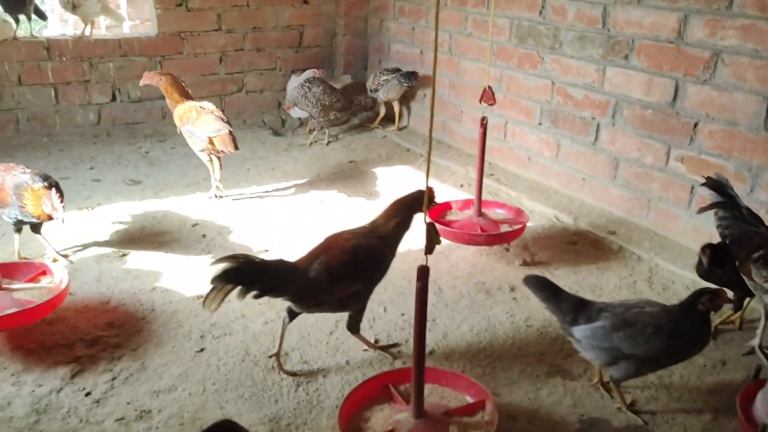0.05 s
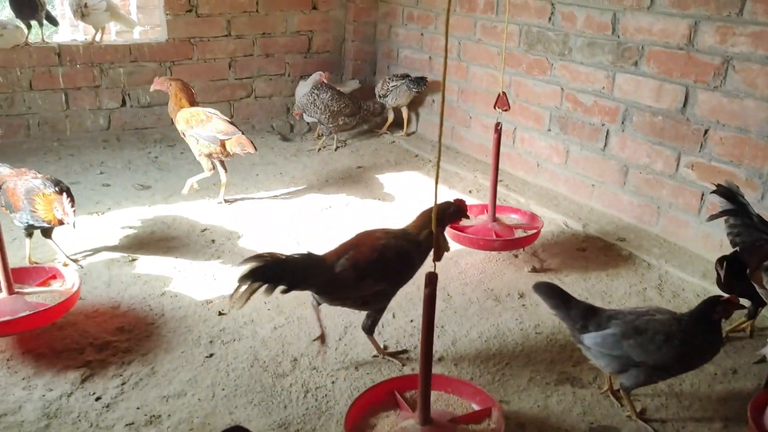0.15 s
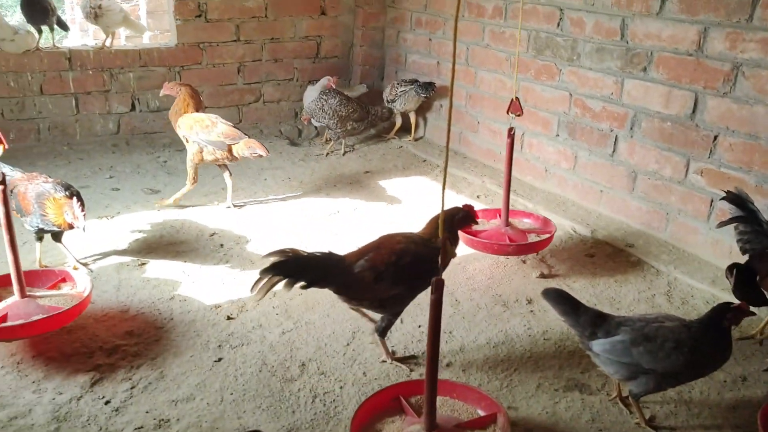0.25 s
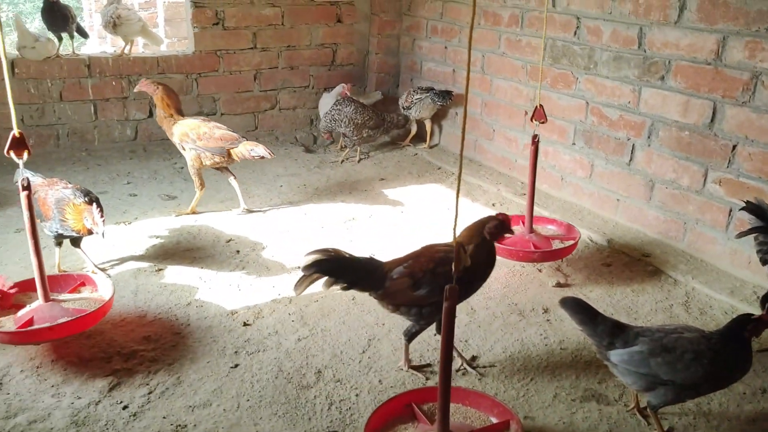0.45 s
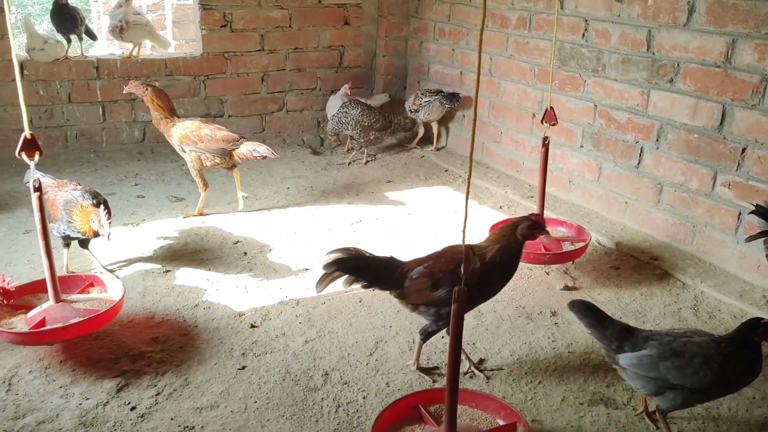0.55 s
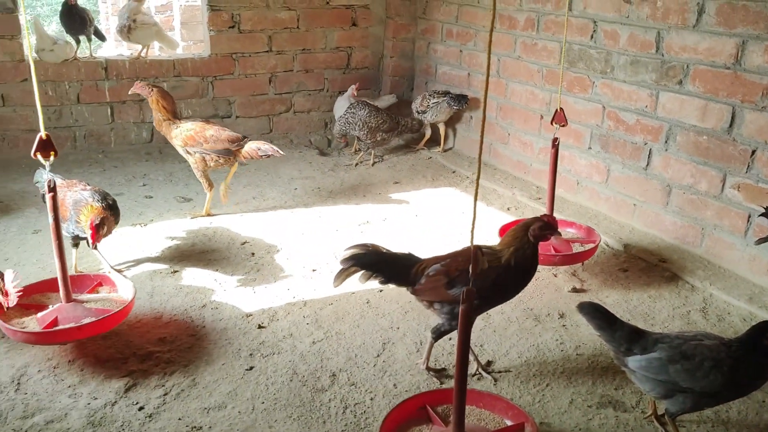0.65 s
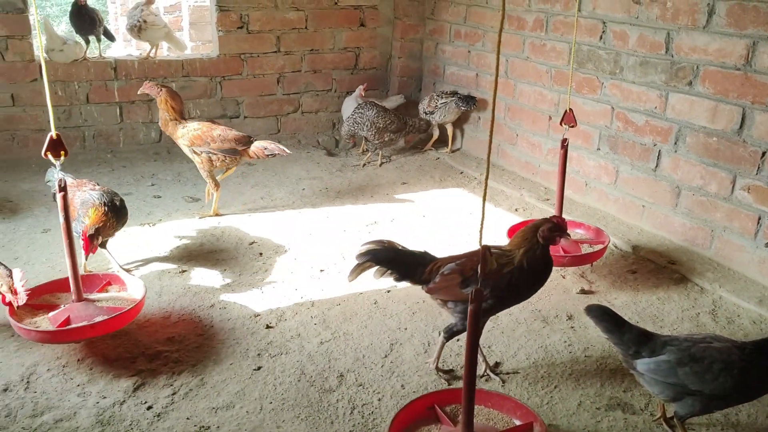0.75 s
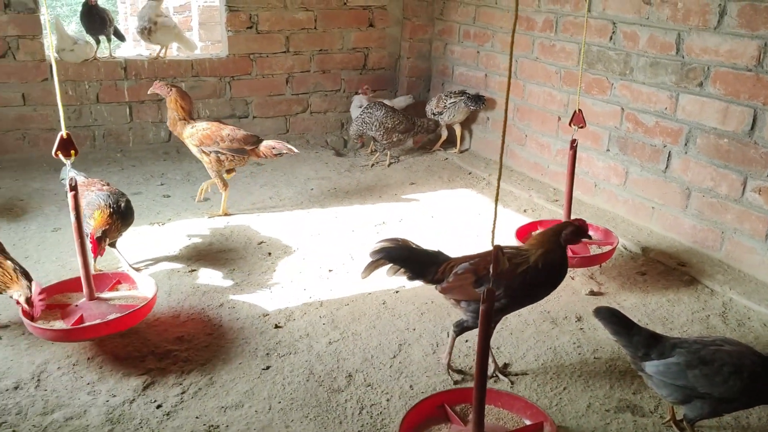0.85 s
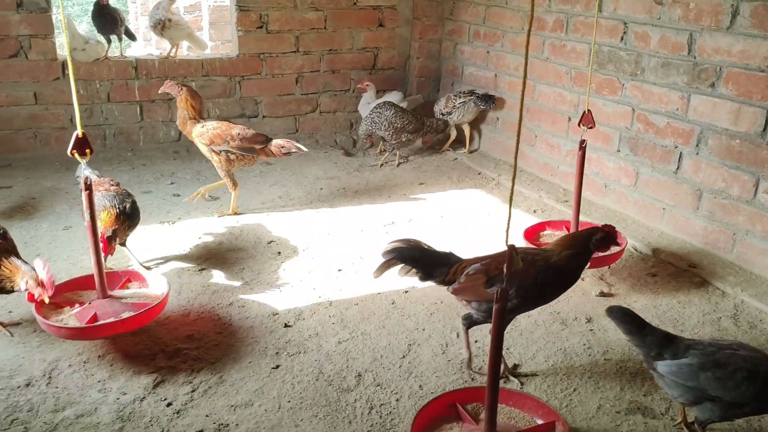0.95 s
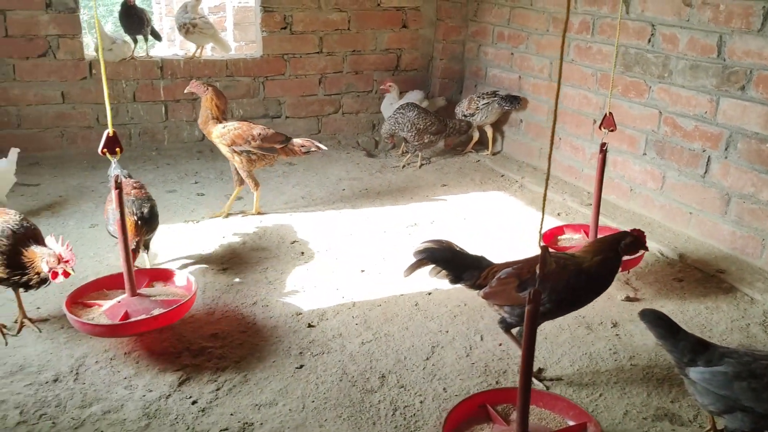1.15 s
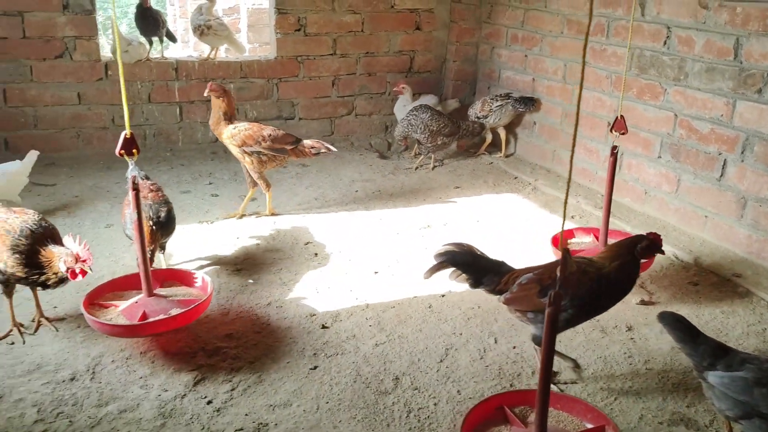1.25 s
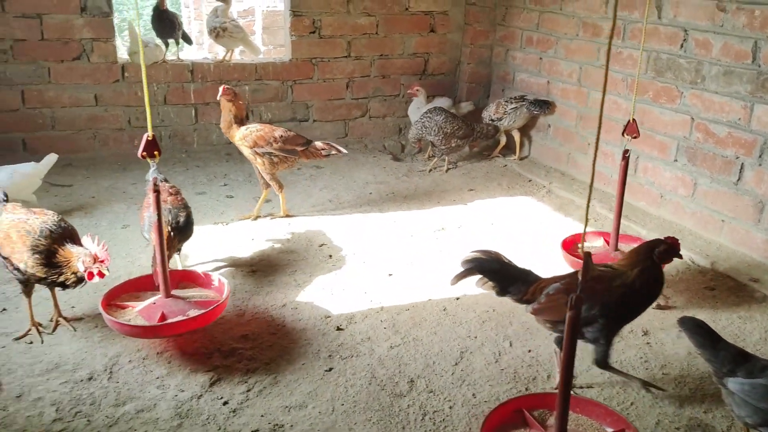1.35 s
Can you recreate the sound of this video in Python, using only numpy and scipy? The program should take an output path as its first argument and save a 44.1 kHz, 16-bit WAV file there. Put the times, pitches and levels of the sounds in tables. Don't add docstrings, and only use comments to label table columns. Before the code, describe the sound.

Single chicken squawk, raspy then droning, with distant thin peeps, soft coos and light feeder taps

```python
import sys
import numpy as np
from scipy import signal
from scipy.io import wavfile

SR = 44100
rng = np.random.default_rng(int(sys.argv[2]) if len(sys.argv) > 2 else 0)


def dump(signal):
    limited = np.clip(np.atleast_2d(signal).T, -1, 1)
    pcm = np.round(limited * 32767).astype(np.int16)
    wavfile.write(sys.argv[1], SR, pcm)


def volts_from_decibels(level):
    exponent = np.asarray(level, float) / 20
    return 10 ** exponent


N = 61739


def rms_one(x):
    return x / np.sqrt(np.mean(x ** 2) + 1e-20)


def drift(rate_hz):
    r = np.exp(-2 * np.pi * rate_hz / SR)
    wander = signal.lfilter([1], [1, -2 * r, r * r], rng.standard_normal(N + SR))
    return rms_one(wander[SR:])


def resonate(x, hz, width_hz):
    r = np.exp(-np.pi * width_hz / SR)
    ring = [1, -2 * r * np.cos(2 * np.pi * hz / SR), r * r]
    return signal.lfilter([(1 - r * r) / 2, 0, (r * r - 1) / 2], ring, x + 1e-18)


def band_pass(x, order, low_hz, high_hz):
    return signal.sosfilt(signal.butter(order, [low_hz, high_hz], "band", fs=SR, output="sos"), x)


def add(out, start_s, x):
    i = int(start_s * SR)
    out[i:i + len(x)] += x[:N - i]


def patchy_noise(colour, patchy_db):
    out, together = 0, drift(4.0)
    edges_hz = 30 * 2 ** np.arange(0, 9.6, .5)
    white = rng.standard_normal((2, N))
    hz, db = np.transpose(colour)
    for k, (low, high) in enumerate(zip(edges_hz, edges_hz[1:])):
        band = band_pass(white[k % 2], 2, low, high)
        level_db = np.interp(np.log(low * high) / 2, np.log(hz), db, left=-35)
        out = out + volts_from_decibels(level_db + patchy_db * (together + drift(26))) * band
    return rms_one(out)


# frequency in Hz, level in dB per Hz.
AIR_COLOUR = [(18, -64), (30, -46), (93, -2), (209, -13.5), (258, -5.5), (735, -16), (860, -12),
              (3360, -31), (15800, -41.5)]


def air():
    return volts_from_decibels(-56) * patchy_noise(AIR_COLOUR, patchy_db=1.7)


# centre in Hz, width in Hz, level in dB.
MOTOR_BANDS = [(68.3, 42, -61.5), (92, 16.5, -61.5), (184.6, 8, -63.5), (234.4, 56, -66), (298, 14.8, -64),
               (600, 18, -68.5)]


def motor_hum():
    hum = 0
    for hz, width_hz, db in MOTOR_BANDS:
        band = resonate(rng.standard_normal(N + SR), hz, width_hz)
        hum = hum + volts_from_decibels(db) * rms_one(resonate(band, hz, 2 * width_hz)[SR:])
    return hum


# time in seconds, level in dB.
FOOT_LEVELS = [(0, -69.5), (.13, -77.5), (.17, -82), (.25, -79.5), (.45, -73), (0.531, -78), (0.569, -92.5),
               (.68, -79.5), (.79, -74), (.83, -88), (0.969, -81), (1.1, -73.5), (1.2, -88), (1.33, -82),
               (1.4, -71)]
# frequency in Hz, level in dB per Hz.
LITTER_COLOUR = [(500, -3.5), (2000, -5.5), (5000, -9), (9000, -14), (15000, -27.5)]


def shuffling_feet():
    s, db = np.transpose(FOOT_LEVELS)
    effort_db = np.interp(np.arange(N) / SR, s, db) + 12
    return volts_from_decibels(effort_db) * patchy_noise(LITTER_COLOUR, patchy_db=2.5)


# start in seconds, level in dB, centre in Hz, width in Hz.
BEAK_TAPS = [(.708, -35, 650, 487), (1.0367, -43, 14500, 3500), (1.043, -52, 13600, 3000),
             (1.036, -42, 6150, 6040), (1.036, -39.5, 1420, 890), (1.173, -50, 6000, 2000),
             (1.2475, -49, 13500, 3500), (1.2208, -48, 1200, 800), (1.226, -49, 1700, 1000),
             (1.2479, -36, 1730, 1280), (1.2485, -49, 8360, 1400), (1.311, -46, 6200, 3000),
             (1.31, -55, 2270, 1010)]
# start in seconds, level in dB, centre in Hz, width in Hz, length in seconds.
GRAIN_SCATTERS = [(0.711, -54, 650, 494, 0.043), (1.042, -67, 13200, 5000, 0.012),
                  (1.038, -50, 5700, 6960, 0.018), (1.04, -52, 1700, 1500, .012),
                  (1.062, -51.5, 1690, 1110, 0.009), (1.249, -51, 2230, 2130, 0.031),
                  (1.253, -64, 8500, 1200, 0.026)]


def feeder_taps():
    grains_per_s = 4000
    out, t = np.zeros(N), np.arange(SR // 5) / SR
    hits = [(s, db, hz, width_hz, 1. * (t == 0)) for s, db, hz, width_hz in BEAK_TAPS]
    for s, db, hz, width_hz, lasts_s in GRAIN_SCATTERS:
        landing = rng.random(len(t)) < grains_per_s / SR
        grains = landing * rng.standard_normal(len(t)) * np.exp(-(t / lasts_s) ** 2)
        hits.append((s, db, hz, width_hz, grains))
    for s, db, hz, width_hz, strike in hits:
        ring = resonate(resonate(strike, hz, width_hz), hz, width_hz)
        add(out, s, volts_from_decibels(db) * SR / (np.pi * width_hz) * ring)
    return out


def whistles(rows, swell, rough):
    edge = 0.17
    out = np.zeros(N)
    flutter = volts_from_decibels(4.5 * drift(150))
    waver = .011 * drift(60)
    for s, length_s, from_hz, to_hz, db in rows:
        u = np.linspace(0, 1, int(length_s * SR))
        slide_hz = from_hz + (to_hz - from_hz) * np.sin(np.pi / 2 * u ** 1.1) ** 2
        wide_slide = abs(to_hz / from_hz - 1) > .1
        wobble = 1 + waver[:len(u)] * wide_slide + rough * np.log(flutter[-len(u):])
        turn = 2 * np.pi * np.cumsum(slide_hz * wobble) / SR
        shape = np.clip(np.minimum(u / swell, (1 - u) / edge), 0, 1)
        octave_db = -11 - 14 * (u + (from_hz < 3200) / 2)
        add(out, s, volts_from_decibels(db) * shape * (np.sin(turn) + volts_from_decibels(octave_db) * np.sin(2 * turn)))
    return out, flutter


# start in seconds, level in dB.
ARCHED_PEEPS = [(0.651, -47.5)]
# time after the start in seconds, pitch in Hz, level in dB.
ARCH_SHAPE = [(0, 2700, -12), (.012, 3000, -8), (.03, 3280, -6), (.05, 3420, -3), (.075, 3330, -2),
              (.105, 2950, 0), (.135, 2720, -1), (.15, 2650, -30)]
# levels in dB, peak times in seconds, spreads in seconds.
ARCH_PARTIALS_DB = [-11, -24]
ARCH_PEAKS_S = [0.058, .04]
ARCH_SPREADS_S = [0.042, 0.019]


def arched_peeps():
    out = np.zeros(N)
    at, hz, level_db = np.transpose(ARCH_SHAPE)
    t = np.arange(0, at[-1], 1 / SR)
    turn = 2 * np.pi * np.cumsum(np.interp(t, at, hz)) / SR
    tone = np.sin(turn)
    for k, (db, peak_s, spread_s) in enumerate(zip(ARCH_PARTIALS_DB, ARCH_PEAKS_S, ARCH_SPREADS_S)):
        bloom = np.exp(-((t - peak_s) / spread_s) ** 2)
        tone = tone + volts_from_decibels(db) * bloom * np.sin((k + 2) * turn)
    call = volts_from_decibels(np.interp(t, at, level_db)) * tone
    for s, db in ARCHED_PEEPS:
        add(out, s, volts_from_decibels(db) * call)
    return out


# start in seconds, length in seconds, first pitch in Hz, last pitch in Hz, level in dB.
FAR_PEEPS = [(0.234, 0.034, 4480, 4450, -66), (.278, 0.031, 4080, 3862, -53),
             (.285, 0.046, 4214, 3120, -55), (.3, 0.03, 3700, 3410, -56.5), (.33, 0.0503, 3840, 3600, -66),
             (.4, 0.028, 4500, 4460, -68.5), (.525, .03, 3330, 3190, -60.5),
             (0.507, 0.045, 4704, 3602, -55.5), (.545, 0.038, 3600, 3934, -57.5),
             (.565, 0.069, 4000, 3003, -60.5), (.722, 0.019, 4240, 3960, -48.5),
             (.742, 0.049, 4068, 2780, -47.5), (.75, 0.041, 4110, 3400, -57.5),
             (1.112, 0.07, 4700, 3550, -49.5), (1.14, .05, 4280, 3950, -58.5),
             (1.165, 0.035, 3950, 3733, -57.5), (1.085, 0.046, 4950, 4800, -77),
             (1.096, 0.032, 5400, 5100, -62), (1.323, 0.051, 6060, 5000, -60),
             (1.337, 0.051, 5150, 4520, -58.5), (1.337, .045, 10250, 9000, -68),
             (1.368, 0.041, 4782, 3510, -52), (1.362, 0.018, 7000, 6660, -72), (.02, 0.06, 3470, 3210, -64),
             (.12, 0.056, 3600, 3130, -66.5)]


def far_peeps():
    thin, flutter = whistles(FAR_PEEPS, swell=0.63, rough=.035)
    return (thin + arched_peeps()) * flutter


# start in seconds, length in seconds, first pitch in Hz, last pitch in Hz, level in dB.
NEAR_COOS = [(.675, .085, 6100, 5950, -67), (.462, 0.0385, 5250, 5300, -66.5), (.5, .055, 6000, 5200, -67),
             (.675, 0.13, 3046, 3010, -45.5), (0.6865, 0.037, 1606, 1610, -46),
             (.73, 0.066, 1652, 1630, -41.5), (.828, 0.024, 1628, 1550, -64), (.72, 0.032, 1373, 1390, -51),
             (1.6, 0.011, 1710, 1560, -54), (1.10, 0.056, 1990, 1900, -65),
             (1.36, 0.021, 2750, 3100, -56.5), (1.375, 0.095, 3033, 3500, -40),
             (1.372, 0.038, 1613, 1750, -54.5)]


def near_coos():
    coos, flutter = whistles(NEAR_COOS, swell=0.32, rough=.004)
    return coos * flutter ** .45


# pitch in Hz, start in seconds,
# swell in seconds, level in dB, # fade in dB per second.
SIDE_TONES = [(776, .245, 0.022, -41.5, 400), (471, 0.2302, 0.019, -31, 169),
              (471.7, .314, 0.022, -34.5, 168), (333, 0.243, 0.034, -36, 350),
              (892, 0.2445, 0.034, -31, 504.5), (969, 0.226, 0.026, -42.5, 198),
              (300, 0.534, 0.019, -46, 259)]


def side_voice():
    t, out = np.arange(N) / SR, 0
    for hz, s, swell_s, db, fade_db in SIDE_TONES:
        swell = np.clip((t - s) / swell_s, 0, 1)
        level_db = db - fade_db * np.maximum(t - s - swell_s, 0) + 1.5 * drift(11)
        turns = hz * np.cumsum(1 + 0.0044 * drift(30)) / SR
        out = out + swell * volts_from_decibels(level_db) * np.sin(2 * np.pi * turns)
    return out


# centre in Hz, width in Hz, level in dB.
THROAT_BANDS = [(320, 20, -7.5), (476, 82, -7), (650, 70, -7.5), (900, 82, -3.5), (1106, 77, -6),
                (1475, 73, -15), (1687, 29, -15.5), (2043, 270, -15), (2250, 91, -45.5)]


def throat_rasp():
    slap_hz = 300 * np.exp(.35 * drift(150))
    slaps = np.diff(np.floor(np.cumsum(slap_hz) / SR), prepend=0)
    slaps = slaps * volts_from_decibels(2.5 * rng.standard_normal(N))
    rasp = 0
    for k, (hz, width_hz, db) in enumerate(THROAT_BANDS):
        rasp = rasp + (-1) ** k * volts_from_decibels(db) / np.sqrt(width_hz) * resonate(slaps, hz, width_hz)
    return band_pass(rms_one(rasp), 4, 314, 2720)


# multiple of the pitch, level in dB.
OPEN_BEAK = [(1, -9.5), (2, -13), (3, -11.5), (4, 7), (5, -23.5), (6, -16.5), (7, -14), (8, -22.5),
             (9, -71)]
CLOSING_BEAK = [(1, -11.5), (2, 0), (3, -1.5), (4, -8), (5, -19.5), (6, -14), (7, -19), (8, -22.5),
                (9, -49)]
SHUT_BEAK = [(1, 3.5), (2, -4.5), (3, -5.5), (4, 6), (5, -10), (6, -23.5), (7, -9.5), (8, -43), (9, -45)]
# time in seconds, multiple, change in dB, half
# width in seconds.
ECHO_DIPS = [(0.21, 3, -13.5, 0.0096), (.325, 3, 1, 0.018), (0.3574, 3, -30, 0.0089),
             (0.3976, 3, -27, 0.0066), (.33, 1, 3, 0.022), (0.289, 2, 10.5, 0.014),
             (.388, 4, -15, 0.0031), (0.43, 4, -10, 0.0038), (0.34, 1, -7, 0.012),
             (0.499, 2, -11, 0.021), (0.527, 4, 3, 0.012), (0.369, 3, 8, .01)]


def drone(turns, closing):
    t, voice = np.arange(N) / SR, 0
    for (k, open_db), (_, closing_db), (_, shut_db) in zip(OPEN_BEAK, CLOSING_BEAK, SHUT_BEAK):
        level_db = np.interp(closing, [0, 1, 2], [open_db, closing_db, shut_db])
        for at, multiple, change_db, half_s in ECHO_DIPS:
            if round(multiple) == k:
                level_db = level_db + change_db * np.exp(-((t - at) / half_s) ** 2)
        level_db = level_db + .7 * drift(32)
        voice = voice + volts_from_decibels(level_db) * np.sin(2 * np.pi * (k * turns + rng.random()))
    return voice


# time in seconds, pitch in Hz, drone level in dB, hoarse level in dB,
# beak (0 open, 1 closing, 2 shut).
SQUAWK_COURSE = [
    (0.229, 300, -72, -63, -3),
    (0.234, 298, -49.5, -36, 0.5),
    (0.283, 293.5, -37, -32, 0.5),
    (0.303, 290.7, -27.5, -36.5, 0.5),
    (0.376, 288.3, -23, -41, 0.57),
    (0.388, 285.8, -24.5, -45.5, 1.49),
    (0.433, 280.7, -24, -44.5, 1),
    (0.474, 283.2, -38.5, -45, 1.33),
    (0.602, 288.7, -74, -67, 20),
]


def hen():
    s, *columns = np.transpose(SQUAWK_COURSE)
    t = np.arange(N) / SR
    hz, voiced_db, hoarse_db, closing = [np.interp(t, s, c) for c in columns]
    sounding = (t > s[0]) * np.clip((s[-1] - t) / 0.033, 0, 1)
    turns = np.cumsum(hz * (1 + .0012 * drift(47))) / SR
    breath = volts_from_decibels(-45.5) * band_pass(rng.standard_normal(N), 2, 2600, 11600)
    voiced = volts_from_decibels(voiced_db) * (drone(turns, np.clip(closing, 0, 2)) + breath)
    return sounding * (voiced + volts_from_decibels(hoarse_db) * throat_rasp()) + side_voice()


def house(x, wet_db):
    low_t60_s, high_t60_s = 0.35, .25
    t = np.arange(SR // 2) / SR
    noise = rng.standard_normal(len(t)) * np.clip(t / 0.0033 - .3, 0, 1)
    low = signal.sosfilt(signal.butter(2, 2200, fs=SR, output="sos"), noise)
    tail = low * volts_from_decibels(-60 * t / low_t60_s) + (noise - low) * volts_from_decibels(-60 * t / high_t60_s)
    return x + volts_from_decibels(wet_db) * signal.fftconvolve(x, tail / np.sqrt(SR * low_t60_s / 14))[:N]


def scene():
    background = air() + motor_hum() + shuffling_feet()
    pecking = house(feeder_taps(), wet_db=-3)
    far = volts_from_decibels(-3.5) * house(far_peeps(), wet_db=5)
    coos = house(near_coos(), wet_db=-10)
    squawk = hen()
    boom = volts_from_decibels(-1) * resonate(squawk, 299.7, 1.67)
    return (background + pecking + far + coos + house(squawk, wet_db=-12) + boom)[None]


def low_pass(x):
    return signal.sosfilt(signal.butter(12, 16350, fs=SR, output="sos"), x)


def record(dry):
    x = signal.sosfilt(signal.butter(2, 45, "high", fs=SR, output="sos"), dry)
    x = signal.sosfilt(signal.ellip(12, .5, 70, 15830, fs=SR, output="sos"), x)
    return low_pass(x)


dry = scene()
out = record(dry)
dump(out)
```